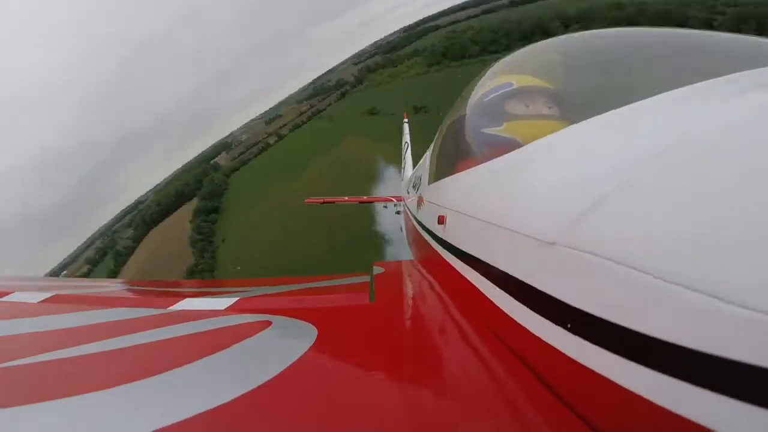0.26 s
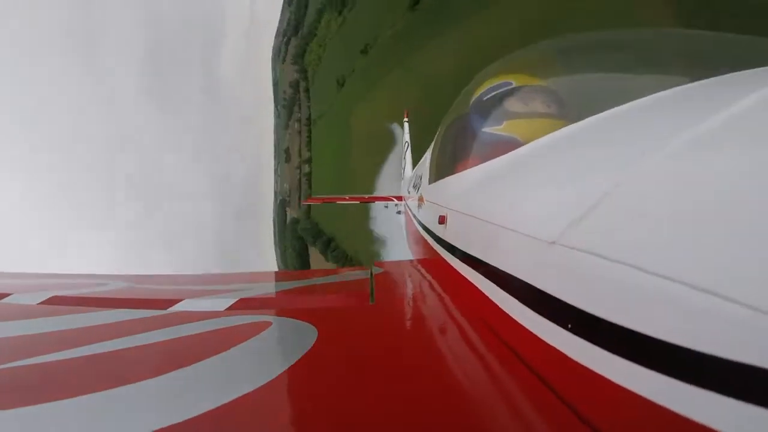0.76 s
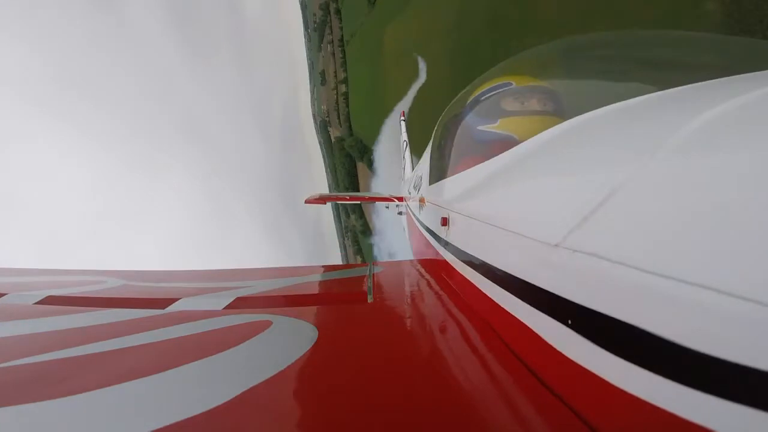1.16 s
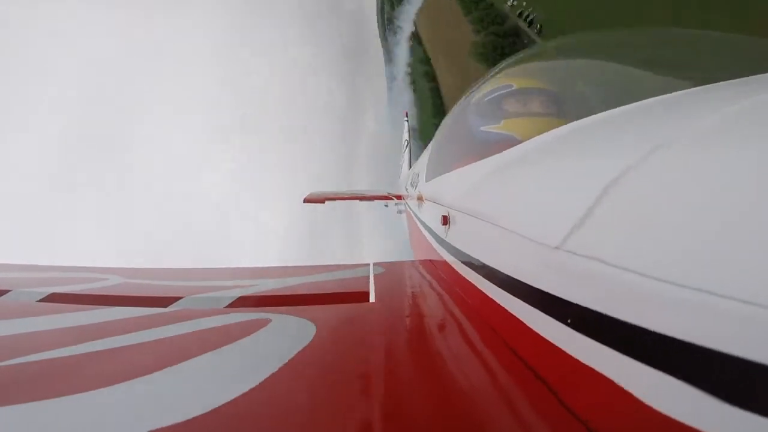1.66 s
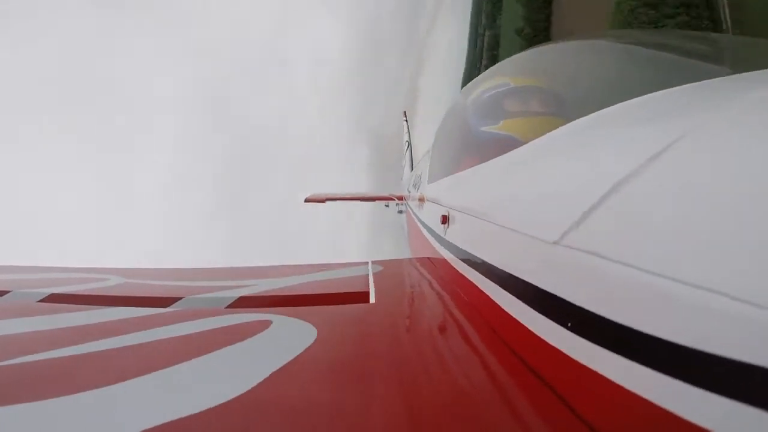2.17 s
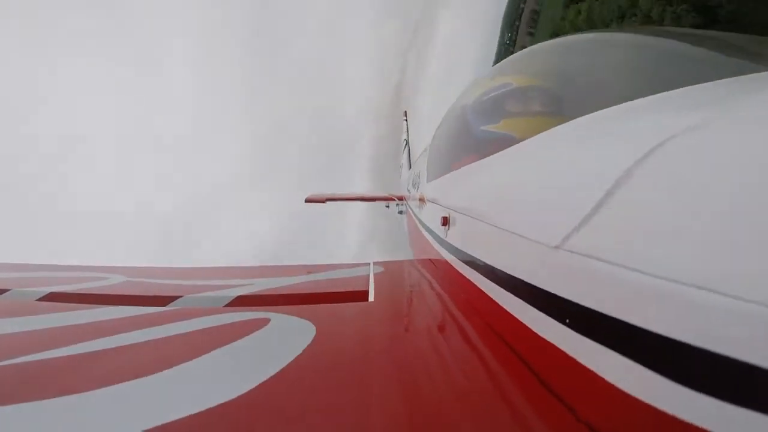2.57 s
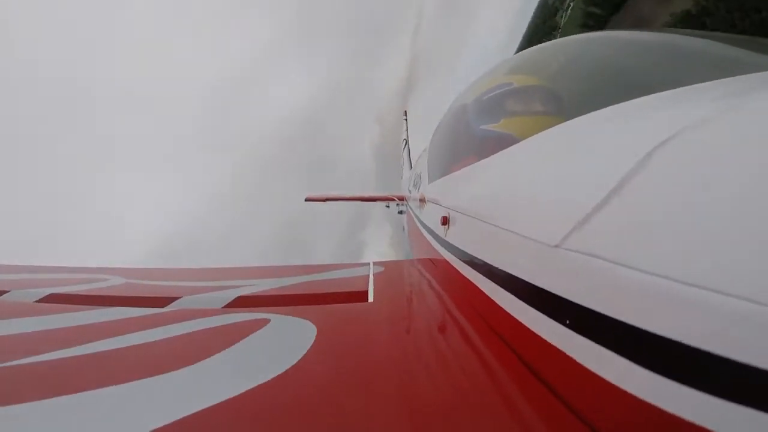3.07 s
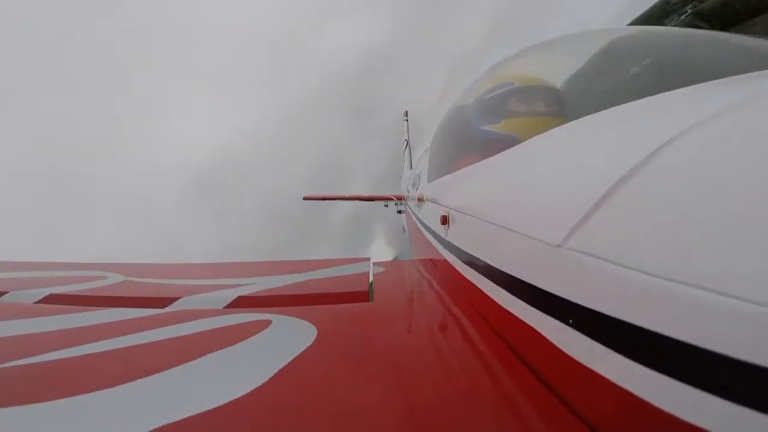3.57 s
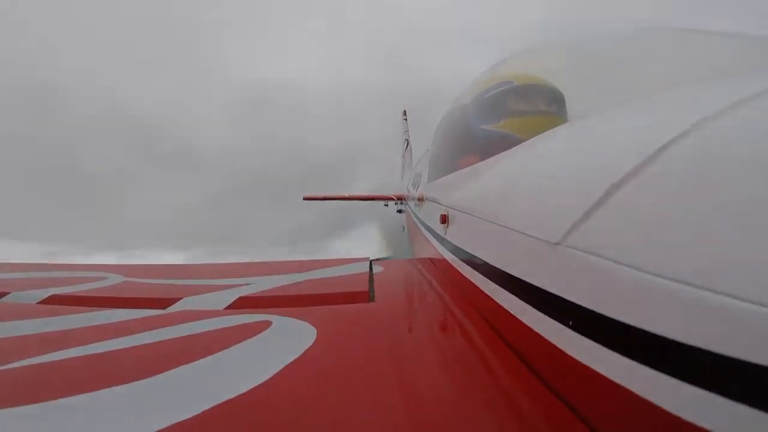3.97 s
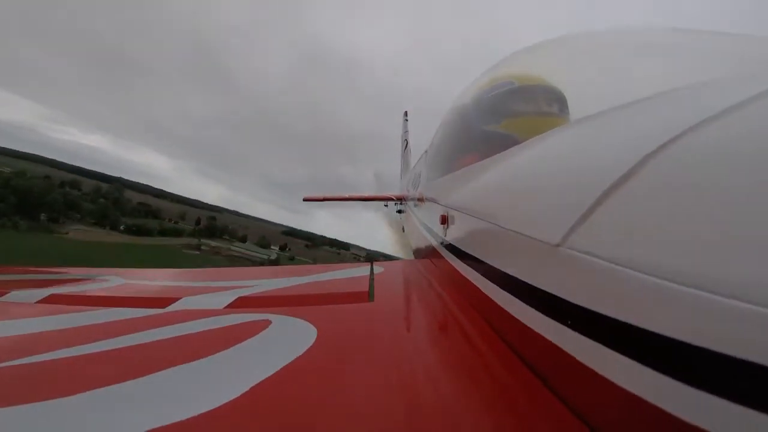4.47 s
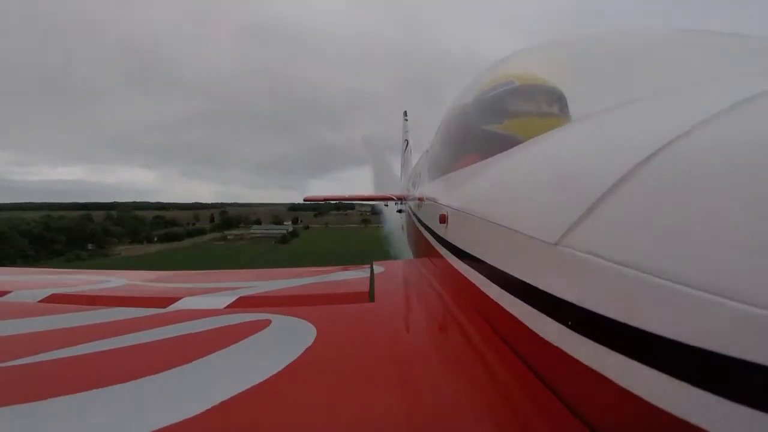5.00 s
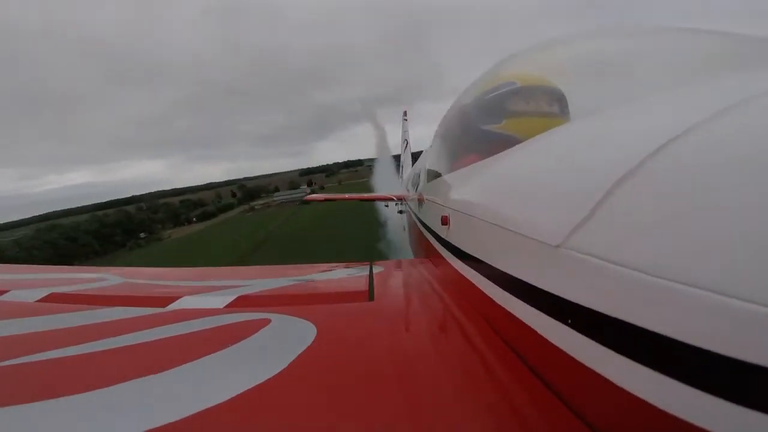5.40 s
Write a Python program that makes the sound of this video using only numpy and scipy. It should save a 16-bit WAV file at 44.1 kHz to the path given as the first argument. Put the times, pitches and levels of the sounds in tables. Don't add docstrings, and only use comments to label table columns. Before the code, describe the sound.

A small petrol engine drives a two-blade propeller at high speed, heard very close on the airframe. The low, rasping drone rises by about three semitones overall, mostly just before and after one second, then stays high. Turbulent air thumps and rumbles against the sealed microphone case, a few knocks cluster between two and three seconds, and a bright wind hiss swells late. Mono, muffled yet gritty, slightly saturated, open air.

```python
import sys
import numpy as np
from scipy import signal
from scipy.fft import rfft, irfft, next_fast_len
from scipy.io import wavfile
from scipy.ndimage import uniform_filter1d

SR = 44100
rng = np.random.default_rng(int(sys.argv[2]) if len(sys.argv) > 2 else 0)


def voltage_ratio(decibels):
    exponent = np.asarray(decibels, float) / 20
    return 10 ** exponent


def int16_out(signal):
    q = np.round(np.clip(np.atleast_2d(signal).T, -1, 1) * 32767)
    wavfile.write(sys.argv[1], SR, q.astype(np.int16))


N = 248724


def rms_one(x):
    return x / np.sqrt(np.mean(x ** 2) + 1e-20)


def in_time(rows):
    t_s, *columns = np.transpose(rows)
    return [np.interp(np.arange(N) / SR, t_s, column) for column in columns]


def drift(rate_hz):
    step = 20
    settle = 4000
    pole = np.exp(-2 * step * np.pi * rate_hz / SR)
    noise = rng.standard_normal(N // step + settle + 2)
    slow = signal.lfilter([1], [1, -2 * pole, pole ** 2], noise)[settle:]
    return np.interp(np.arange(N) / step, np.arange(len(slow)), rms_one(slow))


def colour(x, spectrum):
    size = next_fast_len(N)
    f_hz, level_db = np.transpose(spectrum)
    log_f = np.log(np.arange(size // 2 + 1) * SR / size + 1)
    gain = voltage_ratio(np.interp(log_f, np.log(f_hz), level_db, left=-70, right=-90))
    return rms_one(irfft(rfft(x, size) * gain, size)[:N])


def beats(angle_rad, depth_db, uneven_db, odd_db, late_rad):
    blade_pass = np.floor(angle_rad / np.pi + .5).astype(int)
    strength = rng.standard_normal(blade_pass.max() + 1)[blade_pass]
    strength = uniform_filter1d(strength, size=41)
    blade_db = depth_db * np.cos(2 * angle_rad - late_rad)
    return voltage_ratio(blade_db + odd_db * np.cos(angle_rad) + uneven_db * strength)


def tone(angle_rad, order, level_db, lead_rad, wobble_db, wobble_rad):
    phase_rad = order * angle_rad + lead_rad + wobble_rad * drift(9.7)
    return np.sqrt(2) * voltage_ratio(level_db + wobble_db * drift(11)) * np.cos(phase_rad)


def resonance_db(f_hz, centre_hz, width_hz, lift_db):
    resonant = 1 / (1 + ((f_hz - centre_hz) / width_hz) ** 2)
    return 10 * np.log10(resonant + voltage_ratio(-2 * lift_db))


def case_and_cowl_db(f_hz):
    case_lift_db, wide_cowl_lift_db = 9, 3.5
    case_db = case_lift_db + resonance_db(f_hz, 895, 20, case_lift_db)
    wide_cowl_db = wide_cowl_lift_db + resonance_db(f_hz, 714, 48, wide_cowl_lift_db)
    return case_db + wide_cowl_db


def buffet(wake_db):
    # f/Hz, level/dB per Hz
    buffet_spectrum = [(15, -17.5), (30, -7.5), (45, -2), (90, -4), (150, -2), (300, -3), (500, -10),
                       (900, -25.5)]
    buffet_db = -33 + 0.85 * (wake_db - wake_db.mean())
    swell = voltage_ratio(buffet_db + 10.0 + 1.0 * drift(16.0))
    return swell * colour(rng.standard_normal(N), buffet_spectrum)


def hiss(angle_rad, hiss_db):
    # f/Hz, level/dB per Hz
    hiss_spectrum = [(2000, -22), (3500, -10), (4450, -13.5), (5400, -2.5), (5950, 0.5), (6400, -2.5),
                     (7800, -12.5), (9000, -18), (10200, -24.5), (11500, -33), (13000, -42.5), (16000, -63)]
    pump = beats(angle_rad, depth_db=3.0, uneven_db=-0.63, odd_db=0.6, late_rad=.1)
    pump = pump * voltage_ratio(0.34 * drift(25))
    return voltage_ratio(hiss_db - 1.5) * colour(rng.standard_normal(N) * pump, hiss_spectrum)


def slaps(knock_hz=1600, t60_s=0.0035):
    # t/s, peak level/dB
    slap_events = [(0.126, -15), (0.554, -11.5), (1.689, -11.5), (1.941, -9), (2.236, -2.5), (2.504, -1),
                   (2.741, -1.5), (2.988, -10.5), (3.683, -8), (4.028, -2), (4.271, -9.5), (4.505, -12.5),
                   (5.01, -17), (5.173, -10), (5.574, -13.5)]
    out = np.zeros(N)
    t_s = np.arange(500) / SR
    for start_s, peak_db in slap_events:
        at = round((start_s + .002) * SR)
        decay = voltage_ratio(peak_db - 9.5 - 60 * t_s / t60_s)
        out[at:at + len(t_s)] += decay * np.sin(2 * np.pi * knock_hz * t_s)
    return out


def wake(angle_rad, wake_db, hiss_db):
    # f/Hz, level/dB per Hz
    wake_spectrum = [(120, -15), (250, -6), (450, -2), (700, -2.5), (1000, -5.5), (1500, -11.5),
                     (2200, -19), (3200, -26.5), (4300, -46), (6000, -46)]
    passes = np.flatnonzero(np.diff(np.floor(angle_rad / np.pi)))
    moment, sign, size = rng.standard_normal((len(passes), 3)).T
    firing = np.cos(angle_rad[passes])
    thumps = np.zeros(N)
    at = np.clip(passes + (9 * moment).astype(int), 0, N - 1)
    thumps[at] = np.sign(sign) * voltage_ratio(4.0 * size + 0.53 * firing)

    puffs = rng.standard_normal(N)
    puffs = puffs * beats(angle_rad, depth_db=5.5, uneven_db=0.63, odd_db=0.0, late_rad=0.093)
    burst = colour(0.66 * rms_one(thumps) + rms_one(puffs), wake_spectrum)

    bright_db = 0.27 * (hiss_db - wake_db)
    high_pass = signal.butter(2, 1700, "high", fs=SR, output="sos")
    bright = signal.sosfilt(high_pass, burst)
    swell = voltage_ratio(wake_db + 1.0 + 0.57 * drift(18))
    return swell * (burst + (voltage_ratio(bright_db - bright_db.mean()) - 1) * bright)


def engine(angle_rad, lean_rad, turns_hz):
    # t/s, firing beat level/dB, exhaust rasp level/dB
    firing_table = [(0, -28.5, -30), (.3, -28.5, -24), (.72, -26, -23.5), (.96, -21, -27.5),
                    (1.2, -21, -19.5), (1.44, -31.5, -28.5), (1.92, -24, -20.5), (2.16, -21.5, -21.5),
                    (2.4, -34.5, -23), (2.88, -22.5, -34), (3.2, -28, -28.5), (3.7, -33.5, -21),
                    (4.08, -26, -23.5), (4.32, -34.5, -20), (4.8, -28.5, -21.5), (5.3, -28, -27),
                    (5.64, -26, -27)]
    # order, level/dB re order 5
    odd_orders = [(7, -10.5), (9, -15.5), (11, -13)]
    first_db, third_db = in_time(firing_table)
    beat_db = first_db - first_db.mean()
    rasp_db = third_db - third_db.mean()
    fifth_db = -33 + 0.66 * beat_db + .4 * rasp_db
    pipe_db = -38.5 + resonance_db(13 * turns_hz, centre_hz=1358, width_hz=14, lift_db=19)
    out = tone(angle_rad, 1, first_db, lean_rad, wobble_db=1.0, wobble_rad=0.55)
    out += tone(angle_rad, 3, third_db, lean_rad + 1.48, wobble_db=0.5, wobble_rad=0.24)
    out += tone(angle_rad, 5, fifth_db, lean_rad + 0.38, wobble_db=2.0, wobble_rad=0.65)
    out += tone(angle_rad, 13, pipe_db, lean_rad, wobble_db=3.5, wobble_rad=0.24)
    for order, re_fifth_db in odd_orders:
        level_db = fifth_db + re_fifth_db + case_and_cowl_db(order * turns_hz)
        out += tone(angle_rad, order, level_db, lean_rad, wobble_db=1.0, wobble_rad=0.27)
    return out


def propeller(angle_rad, lean_rad, turns_hz):
    # t/s, blade load as order 2 level/dB, edge of the blade pulse/dB
    blade_table = [(0, -14, -1.5), (.2, -18, -6.5), (.4, -16, 1.5), (.72, -18.5, 2.5), (1.0, -19.5, 4.5),
                   (1.2, -18.5, 0), (1.36, -17, -1.5), (1.7, -15.5, 2.5), (2.2, -13.5, 1.5),
                   (2.5, -13.5, -2.5), (2.76, -16, 2.5), (3.15, -14, -4), (3.4, -17, -9), (3.65, -21.5, -8),
                   (4.05, -20.5, 0.5), (4.44, -16.5, -12), (5.0, -13.5, -3), (5.64, -12, -8.5)]
    # order, level/dB re order 8
    upper_orders = [(10, -3.5), (12, -7.5), (14, -11), (16, -16.5)]
    second_db, edge_db = in_time(blade_table)
    load_db = second_db - second_db.mean()
    panel_db = resonance_db(4 * turns_hz, centre_hz=398, width_hz=14.8, lift_db=8)
    fourth_db = -19.5 + 0.51 * load_db + panel_db
    sixth_db = -27 + edge_db
    upper_db = -33.5 + 0.76 * edge_db
    eighth_db = upper_db - 3.0 + case_and_cowl_db(8 * turns_hz)
    out = tone(angle_rad, 2, second_db, lean_rad, wobble_db=0.32, wobble_rad=0.052)
    out += tone(angle_rad, 4, fourth_db, lean_rad, wobble_db=.5, wobble_rad=.13)
    out += tone(angle_rad, 6, sixth_db, lean_rad, wobble_db=0.06, wobble_rad=0.11)
    out += tone(angle_rad, 8, eighth_db, lean_rad, wobble_db=0.0, wobble_rad=0.13)
    for order, re_eighth_db in upper_orders:
        level_db = upper_db + re_eighth_db
        out += tone(angle_rad, order, level_db, lean_rad, wobble_db=0.0, wobble_rad=0.15)
    return out


def scene():
    # t/s, speed/(turns per s)
    shaft_speed = [(0, 85.72), (.14, 85.62), (.38, 87.62), (.6, 85.12), (.74, 84.82), (.84, 87.44),
                   (1.0, 93.44), (1.2, 96.05), (1.44, 96.42), (2.0, 98.72), (2.62, 102.0), (2.88, 101.44),
                   (3.24, 101.98), (3.66, 103.43), (4.68, 103.23), (5.06, 103.5), (5.4, 104.45),
                   (5.64, 104.05)]
    # t/s, level/dB
    air_rush = [(0.0, -38), (0.01, -42), (1.16, -43), (1.68, -45.5), (2.06, -42.5), (2.68, -42),
                (3.63, -38.5), (4.11, -35), (5.64, -32)]
    # t/s, level/dB
    gusts = [(0, -28.5), (.1, -27.5), (1.0, -28), (1.5, -24.5), (2.3, -24.5), (2.6, -26.5), (2.76, -23.5),
             (3.5, -29.5), (4.6, -25.5), (5.2, -24.5), (5.35, -23), (5.64, -23.5)]
    # t/s, lean of the partials/rad (0 a spike, -1.5 a steep front with a slow fall)
    pulse_lean = [
        (0, .4),
        (.9, .4),
        (1.25, -1.2),
        (5.64, -1.5),
    ]
    turns_hz, = in_time(shaft_speed)
    hiss_db, = in_time(air_rush)
    wake_db, = in_time(gusts)
    lean_rad, = in_time(pulse_lean)
    start_rad = 1.55
    angle_rad = start_rad + 2 * np.pi * np.cumsum(turns_hz) / SR
    air = buffet(wake_db) + hiss(angle_rad, hiss_db) + slaps() + wake(angle_rad, wake_db, hiss_db)
    motor = engine(angle_rad, lean_rad, turns_hz) + propeller(angle_rad, lean_rad, turns_hz)
    return (air + motor)[None]


def low_pass(x):
    return signal.sosfilt(signal.butter(12, 13200, fs=SR, output="sos"), x)


def record(dry):
    mix = 1.345 * np.tanh(dry / 1.25)
    return low_pass(mix)


dry = scene()
out = record(dry)
int16_out(out)
```